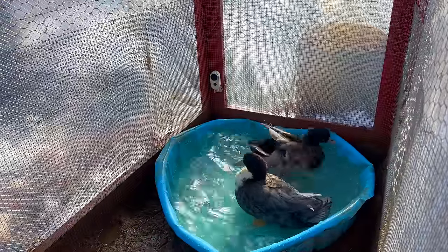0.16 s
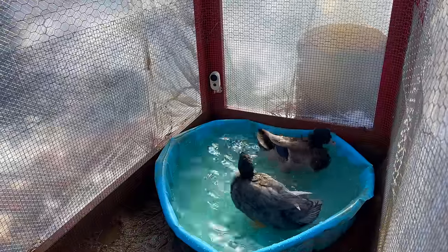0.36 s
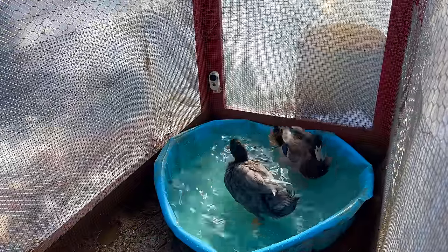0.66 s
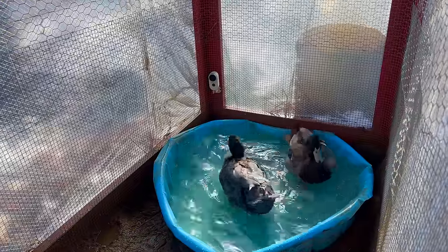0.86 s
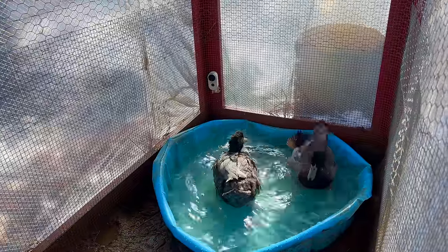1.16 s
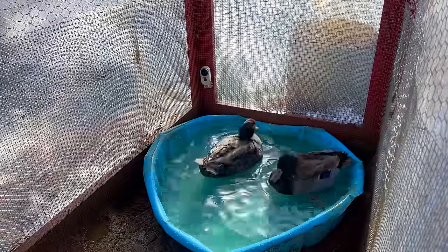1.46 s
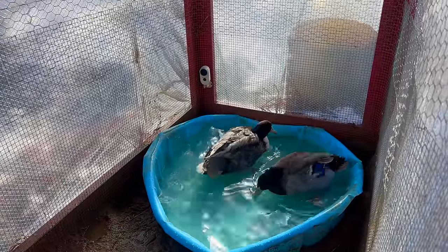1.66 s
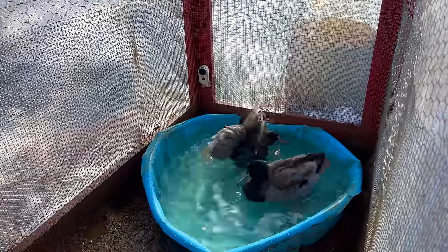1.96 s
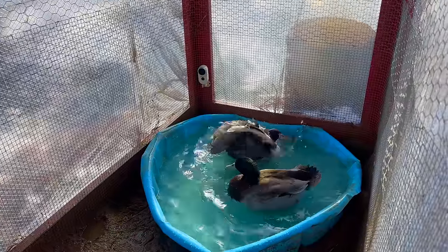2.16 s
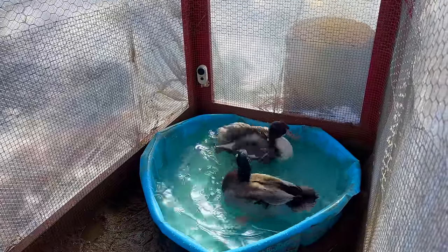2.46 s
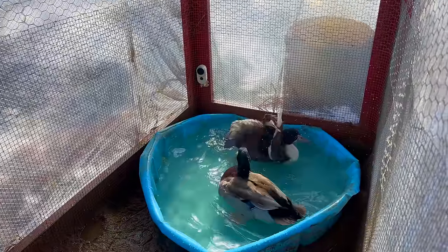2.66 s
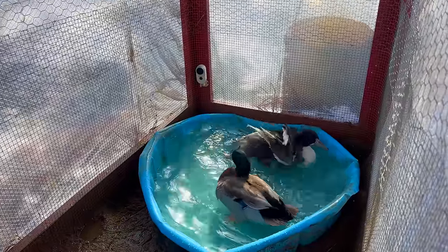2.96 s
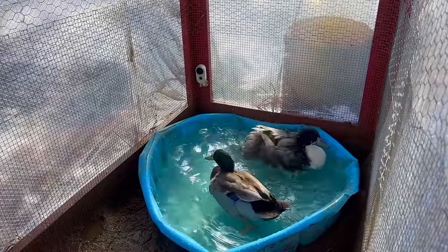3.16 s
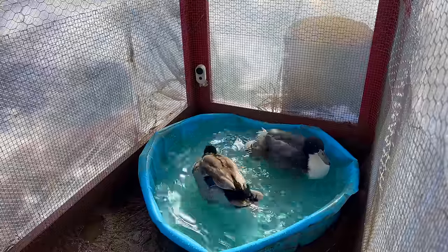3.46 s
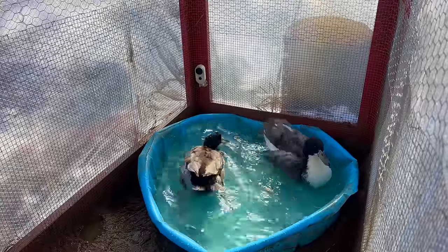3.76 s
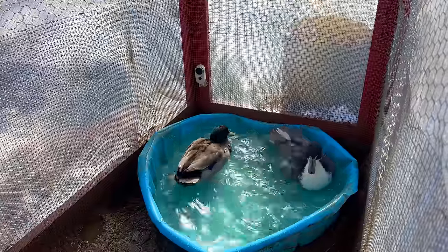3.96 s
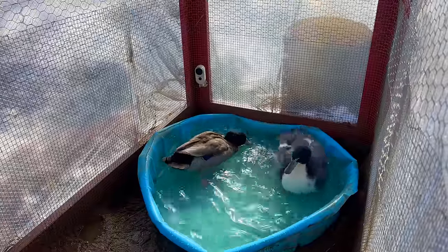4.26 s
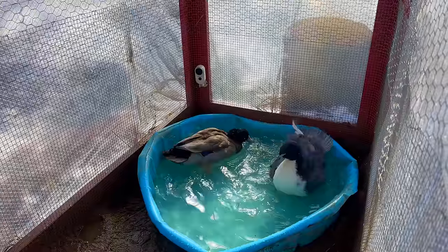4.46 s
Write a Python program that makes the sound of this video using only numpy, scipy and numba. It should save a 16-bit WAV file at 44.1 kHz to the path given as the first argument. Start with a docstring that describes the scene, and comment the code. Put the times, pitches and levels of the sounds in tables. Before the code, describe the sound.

Close duck bathing: bright splashes and plops, a quieter lull, a fast feather-shake buzz ending in a snap, then renewed splashing with short quacks.

```python
"""Ducks paddle and bathe in a small plastic pool in a pen, over a low rumble.
Hard paddling opens: bubble clouds ring, slaps, plops and drips on top; it eases under soft raspy quacks.
At 1.7 s a bird shivers its wet feathers: pulsed noise and stroke multiples buzz, rattle grows, a snap ends it.
Bathing resumes at 2.4 s with surges, plops and a few quacks; dull thumps and a last surge close.
Bubbles are decaying sines of rising pitch; near walls add short noise tails."""
import sys
import numpy as np
from scipy import signal
from scipy.fft import rfft, irfft, next_fast_len
from scipy.io import wavfile
from scipy.ndimage import uniform_filter1d
from numba import njit

SR = 44100
rng = np.random.default_rng(int(sys.argv[2]) if len(sys.argv) > 2 else 0)


def generate_wav(signal):
    """Clip the signal to [-1, 1] and save it as 16-bit WAV at the path in sys.argv[1]."""
    frames = np.transpose(np.atleast_2d(signal))
    scaled = np.clip(frames, -1, 1) * 32767
    pcm = np.round(scaled).astype(np.int16)
    wavfile.write(sys.argv[1], SR, pcm)


N = 202815
TIME = np.arange(N) / SR

# low rumble: time_s, level_db
RUMBLE_LEVEL = [(0, -53), (1.1, -52.5), (1.55, -56), (2.05, -49), (2.9, -50.5), (3.2, -53.5), (3.8, -54.5),
                (4.6, -50.5)]
# rumble filter: freq_hz, gain_db
RUMBLE_COLOUR = [(20, -40), (30, -24), (42, -10), (62, 0.5), (80, -2), (120, -6.5), (180, -10), (300, -25),
                 (1000, -45), (4000, -76)]

# thumps of large air pockets and the pool wall: start_s, peak_db, pitch_hz, t60_s
THUMPS = [(.213, -37.5, 307, 0.19), (0.235, -39, 185, 0.1), (1.086, -41.5, 73.7, 0.54),
          (2.777, -26, 160, 0.034), (3.16, -34.5, 312, 0.11), (4.453, -36, 340, 0.077),
          (4.455, -29, 158, 0.17), (4.56, -29, 143, 0.09)]

# quacks: loudest_s, level_db, rise_s, fall_s, pitch_hz, lowest_throat_hz, rasp (0-1)
QUACKS = [(.505, -43, 0.033, 0.041, 188.2, 1185, 0.66), (1.111, -50, 0.037, .032, 180, 1260, .75),
          (1.297, -47, 0.0091, 0.015, 200, 1270, 0.79), (1.524, -39, 0.012, 0.012, 567, 1276, 0.2),
          (2.669, -31.5, 0.018, .009, 430.4, 1272, 0.19), (2.897, -32, 0.023, 0.027, 214.4, 1263, 0.57),
          (4.198, -42, 0.021, 0.023, 167.9, 1295, 0.59)]
# throat resonances, scaled to lowest_throat_hz: freq_hz, width_hz, gain_db
THROAT = [(1270, 110, 0), (1500, 120, -1), (1710, 90, 0), (1990, 140, -13), (2200, 120, -8)]

# body hum of the shiver: stroke_multiple, level_db
HUM_PARTIALS = [(1, -4), (2, -8), (3, 3), (4, -8), (5, -5), (6, -10), (7, -13), (8, -14), (9, -9), (10, -1),
                (11, -6.5), (12, -6.5)]
# buzz of the stiff feathers: stroke_multiple, level_db
BUZZ_PARTIALS = [(22, -8), (32, -8), (35, -7), (37, -4), (38, -6), (39, -1), (40, -2), (41, 1), (44, -3),
                 (45, -7), (47, -5), (49, 0), (50, -1), (51, -8)]
# feather rattle filter: freq_hz, gain_db
RATTLE_COLOUR = [(1000, -25), (1350, -1.5), (1800, -32), (2150, -4), (2450, 1.5), (2850, 1), (3080, -1),
                 (3300, -3.5), (4500, -40)]
# wet feather swish filter: freq_hz, gain_db
SWISH_COLOUR = [(3500, -12), (4700, 0.5), (5900, 2.5), (7200, 2.5), (7700, 1), (9200, 4.5), (11000, -45),
                (14500, 0.5)]
# modes of the snap: freq_hz, level_db (re SNAP_DB), t60_s
SNAP_MODES = [(2760, -11, 0.015), (5600, -11, 0.004), (8760, 1, 0.0062), (13800, -3, .004),
              (15000, -3, .005)]

# single drops on the surface: start_s, peak_db, bubble_pitch_hz
DRIPS = [(.199, -33, 3100), (.229, -37, 2410), (.257, -30, 3740), (0.321, -33, 3270), (0.34, -39, 2900),
         (.388, -36.5, 2150), (.611, -34, 2410), (0.662, -39, 4500), (2.499, -31, 6350), (2.558, -40, 1530),
         (2.78, -32.5, 1730), (3.112, -35, 3130), (3.237, -27.5, 4620), (3.25, -32, 3560),
         (3.343, -36, 6950), (3.406, -36, 2670), (3.453, -28, 2270), (3.519, -35, 4570), (3.877, -43, 1253),
         (4.015, -34.5, 4030), (4.138, -39, 2820), (4.302, -40, 1784), (4.318, -38, 2580),
         (4.377, -37, 3770), (4.51, -33, 2780)]
# slaps of feet and breast on the water: start_s, level_db, middle_pitch_hz, decay_s
SLAPS = [(.001, -38, 1100, 0.014), (0.02, -43, 1610, 0.031), (.191, -37, 1370, .022),
         (0.251, -42, 1010, 0.014), (0.387, -43.5, 1220, 0.009), (0.608, -45.5, 2520, 0.014),
         (0.673, -63, 1380, 0.019), (1.002, -56, 1400, 0.015), (1.056, -53, 716, 0.022),
         (1.484, -49.5, 790, 0.0095), (1.496, -50.5, 1430, 0.023), (1.654, -57, 1870, 0.011),
         (2.311, -52, 1320, 0.013), (2.559, -46.5, 1390, 0.0056), (2.628, -45, 590, 0.021),
         (2.779, -42, 1370, 0.0058), (2.985, -46.5, 1520, 0.025), (3.072, -42.5, 2750, 0.0088),
         (3.147, -42, 1150, 0.013), (3.155, -44.5, 530, .018), (3.284, -45.5, 690, 0.014),
         (3.377, -49, 930, 0.024), (3.405, -45, 1660, 0.045), (3.441, -41, 860, 0.028),
         (3.45, -48, 2270, 0.014), (3.64, -42.5, 2110, 0.016), (3.652, -38.5, 1350, 0.02),
         (3.815, -54, 2070, 0.025), (3.877, -42.5, 1080, 0.0038), (4.016, -47.5, 3920, 0.013),
         (4.139, -54, 2640, 0.0088), (4.3, -47, 580, 0.015), (4.303, -48, 2080, 0.02),
         (4.449, -43, 745, 0.019), (4.581, -44, 687, 0.015)]
# single large bubbles: start_s, peak_db, pitch_hz, t60_s, rise_octaves_per_s
PLOPS = [(.058, -34.5, 1600, 0.14, 11.5), (.023, -28, 1270, .04, 5), (.193, -23, 1287, 0.036, 10),
         (.221, -40, 430, 0.039, 6), (.228, -27, 1050, 0.025, -2), (.254, -27, 1016, 0.024, -7),
         (.311, -39, 1270, 0.06, 7), (.336, -35.5, 1250, 0.029, 14), (.386, -34, 630, 0.05, -1),
         (.468, -39, 855, 0.046, 1), (.497, -29.5, 1950, 0.036, -4), (.584, -38, 1007, 0.051, -1.5),
         (.778, -42.5, 1275, 0.05, 2), (1.514, -38, 973, 0.057, -1), (2.556, -29.5, 1286, 0.08, 17.5),
         (2.688, -28.5, 1840, 0.04, 9.5), (2.859, -29, 1200, 0.082, 9), (2.914, -34, 2205, 0.042, -4),
         (3.073, -29.5, 1990, 0.032, -4), (3.128, -28, 1750, 0.027, 7), (3.228, -25.5, 1248, 0.071, 1),
         (3.32, -37.5, 1064, 0.081, 2), (3.446, -25.5, 1244, 0.029, 0), (3.524, -39.5, 934, 0.08, 12),
         (3.636, -28, 730, 0.037, -4), (3.641, -24, 2330, 0.026, 25.5), (3.689, -28.5, 714, 0.06, 2.5),
         (3.792, -39, 1970, 0.029, 16), (3.827, -36.5, 1613, 0.05, 6), (4, -42, 1022, 0.14, 9.5),
         (4.016, -36, 3540, 0.055, 8), (4.154, -30, 1650, 0.038, 6), (4.186, -36.5, 978, 0.064, -1.5),
         (4.216, -35, 1380, 0.043, 4), (4.303, -42, 1776, 0.049, 7), (4.551, -37, 750, 0.036, -1)]

# how hard the birds stir the water: time_s, effort_db (re the water levels below)
PADDLING = [(0, 4.5), (.27, -10), (.42, -8.5), (.56, -19.5), (.82, -25.5), (.98, -19), (1.22, -21),
            (1.42, -28.5), (1.66, -28.5), (2.2, -7), (2.46, -8.5), (2.8, -4), (3.04, -9.5), (3.42, -8.5),
            (3.6, -15.5), (3.82, -20.5), (4.1, -14.5), (4.34, -14), (4.6, -1.5)]
# surges as a bird kicks or dips: peak_s, half_width_s (to 1/e power), spray_db, slosh_db
SURGES = [(0.223, 0.047, -34.5, -43), (0.638, 0.049, -52, -57), (0.947, 0.028, -53, -61.5),
          (1.06, 0.027, -65, -58), (1.513, 0.012, -55.5, -69), (1.64, 0.024, -57.5, -83),
          (2.669, 0.019, -41.5, -56), (2.78, 0.046, -48, -56), (2.905, 0.023, -42.5, -52),
          (2.98, 0.015, -39.5, -52), (3.148, 0.013, -39, -46.5), (3.885, 0.015, -51, -53.5),
          (4.46, 0.15, -48, -53)]
# thrown spray falling back: start_s, level_db, decay_s
SPATTER = [(0.107, -32, .0053), (0.197, -31.5, 0.0054), (0.323, -37, 0.029), (0.464, -37.5, 0.022),
           (1.482, -51, 0.014), (2.048, -31, 0.012), (2.351, -30.5, 0.016), (2.5, -38, 0.026),
           (3.07, -40, 0.045), (3.111, -38, 0.027), (3.233, -37.5, 0.031), (3.276, -39, 0.025),
           (3.481, -38.5, 0.034), (3.654, -40, 0.019), (4.139, -43, 0.045), (4.22, -40, 0.015),
           (4.372, -43, 0.021), (4.478, -39.5, 0.038), (4.515, -37, 0.012)]
# spray filter: freq_hz, gain_db
SPRAY_COLOUR = [(300, -20), (900, -4), (1300, -1), (2300, .5), (3200, -1.5), (4300, -.5), (5300, -1.8),
                (7100, 1), (7700, 0), (8700, 5.5), (9500, 2.5), (10500, -5), (12300, -4), (13200, 2.5),
                (14700, 4), (15500, 3)]
# gain of the spray above TREBLE_EDGE_HZ: time_s, gain_db
SPRAY_TREBLE = [(0, -8), (.7, -7), (1.4, -15.5), (2.3, -10), (3.3, -8), (3.8, -6), (4.6, -2.5)]
# slosh filter: freq_hz, gain_db
SLOSH_COLOUR = [(30, -40), (90, -3), (170, -1), (320, -0.5), (430, -4), (620, 3), (1000, -7), (1500, -8.5),
                (2200, -9.5), (4000, -28)]

# stereo width: freq_hz, side_re_mid_db
WIDTH = [(120, -11), (300, -4), (1200, -2), (4500, -1), (6500, -5), (8500, -11), (15000, -16)]
# microphone colour, left minus right: freq_hz, difference_db
MIC_DIFFERENCE = [(200, 0), (500, 1), (1200, -0.5), (2500, -1), (4300, 1.5), (6500, 7.5), (9000, 1)]

# shiver
SHIVER_START_S, SHIVER_END_S, SHIVER_ATTACK_S, SHIVER_RELEASE_S = 1.682, 2.416, 0.017, 0.076
SHIVER_SWELL_DB_PER_S = 2
SHED_ATTACK_S = 0.085  # swish and sizzle build more slowly
STROKE_HZ = 61.83
HUM_DB, RUSTLE_DB, SWISH_DB = -44, -49, -43.5
RATTLE_DB, RATTLE_SWELL_DB, RATTLE_START_S, RATTLE_RISE_S = -47, 7.5, 2.13, 0.022
BUZZ_DB = -3.5  # within the rattle
SIZZLE_DB, SIZZLE_HZ, SIZZLE_WIDTH_HZ = -47, 8200, 380
SHIVER_SPRAY_DB, SHIVER_SLOSH_DB = -45, -49.5  # water shaken off and stirred up
SNAP_S, SNAP_DB = 2.3491, -22

# water
SPRAY_DB, SLOSH_DB, DROPS_DB = -38, -49.5, -52.5  # at 0 dB effort
SLOSH_FOLLOW, DROPS_FOLLOW = 0.64, 0.93  # dB per dB of effort
SPURT_DB = 2.5  # spray flicker
TREBLE_EDGE_HZ = 9100

# microphones
MIC_LAG_S, LAG_FADE_HZ, TOP_HZ = 2.5e-5, 8000, 15800


def undb(db):
    """Decibels to gain."""
    return 10 ** (np.asarray(db) / 20)


def unit(x):
    """Scale to rms 1."""
    return x / np.sqrt(np.mean(x ** 2) + 1e-20)


def curves(table):
    """Interpolate each table column through time."""
    time_s, *columns = np.transpose(table)
    return [np.interp(TIME, time_s, column) for column in columns]


def colour(x, points):
    """Filter by (Hz, dB) points, linear in log frequency."""
    hz, db = np.transpose(points)
    size = next_fast_len(x.shape[-1] + 2048)
    f = np.maximum(np.fft.rfftfreq(size, 1 / SR), 1)
    gain = undb(np.interp(np.log(f), np.log(hz), db))
    return irfft(rfft(x, size) * gain, size)[..., :x.shape[-1]]


def resonate(x, hz, width_hz):
    """One resonance, gain 1 at its centre."""
    return signal.lfilter(*signal.iirpeak(hz, hz / width_hz, fs=SR), x)


def add(track, start_s, sound):
    """Mix a sound in at start_s."""
    start = int(np.clip(start_s * SR, 0, N - 1))
    track[start:start + len(sound)] += sound[:N - start]


def spread(mid, side):
    """Left and right from mid and side."""
    return mid + side * np.array([[1], [-1]])


@njit
def ring(length, starts, hz, cycles, sizes, glide):
    """Bubbles: each rings for some cycles down to -60 dB while its pitch rises by the share glide."""
    out = np.zeros(length)
    for k in range(len(starts)):
        life = cycles[k] * SR / hz[k]  # samples
        first = int(starts[k] * SR)
        step = 2 * np.pi * hz[k] / SR
        z = sizes[k] + 0j
        turn = np.exp(1j * step - np.log(1000) / life)
        bend = np.exp(1j * step * glide / life)
        for i in range(first, min(length, first + int(life))):
            z, turn = z * turn, turn * bend
            out[i] += z.imag
    return out


def cloud(lo_hz, hi_hz, cycles, scatter_db, count, glide=0.088):
    """An unbroken patter of bubbles between two pitches, a few much larger than the rest."""
    when, pitch, life, size = rng.random((count, 4)).T
    hz = lo_hz + (min(hi_hz, SR / 2.5) - lo_hz) * pitch
    sizes = undb(-scatter_db * np.log(np.maximum(size, .01))) * np.sqrt(hz)
    sizes = sizes * rng.choice([-1, 1], count)
    return unit(ring(N, when * N / SR, hz, cycles * (.5 + life), sizes, glide))


def bubble(hz, t60_s, rise_oct_per_s, attack_s):
    """A large bubble swells and rings; its pitch glides, by at most an octave upward."""
    t = TIME[:SR // 3]
    phase = 2 * np.pi * np.cumsum(hz * 2 ** np.minimum(rise_oct_per_s * t, 1)) / SR
    return np.sin(phase) * (1 - np.exp(-t / attack_s)) * np.exp(-np.log(1000) * t / t60_s)


def pen(x, wet_db, t60_s, gap_s):
    """The near walls return a short, dense tail that differs left and right."""
    t = TIME[:SR // 3]
    tail = rng.standard_normal((2, len(t))) * np.exp(-np.log(1000) * t / t60_s) * (t > gap_s)
    tail = tail / np.sqrt(np.sum(tail ** 2, axis=1, keepdims=True))
    tail = colour(tail, [(100, -5.0), (400, -1.5), (1500, 5.5), (4500, 6.0), (9000, 11.5)])
    return x + undb(wet_db) * signal.fftconvolve(np.atleast_2d(x), tail, axes=1)[:, :N]


def rumble():
    """Low filtered noise, slowly varying in level, nearly the same on both sides."""
    level_db, = curves(RUMBLE_LEVEL)
    mid, side = (unit(colour(rng.standard_normal(N), RUMBLE_COLOUR)) for _ in range(2))
    even = mid / np.sqrt(uniform_filter1d(mid ** 2, size=SR // 6))
    return spread(even, undb(-17.5) * side) * undb(level_db)


def thumps():
    """Large air pockets and the pool wall give deep decaying thumps."""
    out = np.zeros(N)
    for start_s, db, hz, t60_s in THUMPS:
        add(out, start_s, undb(db) * bubble(hz, t60_s, rise_oct_per_s=-0.18, attack_s=0.002))
    return out


def quacks(jitter=0.1163, open_share=1.0, climb_per_s=1.97):
    """Pulses and gated air ring the throat; pitch climbs as the bill opens, rasp makes pulses uneven."""
    out = np.zeros(N)
    t = np.arange(-SR // 8, SR // 8) / SR
    band = signal.butter(4, [1050, 2550], "band", fs=SR, output="sos")
    for loudest_s, db, rise_s, fall_s, hz, throat_hz, rasp in QUACKS:
        rasp = np.clip(rasp, 0, 1)
        wobble = unit(uniform_filter1d(rng.standard_normal(len(t)), size=200))
        phase = np.cumsum(hz * (1 + jitter * rasp * wobble)) / SR  # cycles
        pulses = sum(np.cos(2 * np.pi * k * phase) for k in np.arange(1, SR / 10 / hz))
        air = np.exp(-(phase % 1) / open_share) * rng.standard_normal(len(t))
        source = np.sqrt(1 - rasp) * unit(pulses) + np.sqrt(rasp) * unit(air)
        scale = throat_hz / THROAT[0][0]
        voice = sum(undb(gain_db) * resonate(source, f * scale, w) for f, w, gain_db in THROAT)
        voice = signal.sosfilt(band, voice)
        # time warp: pitch and resonances climb up to the loudest point
        voice = np.interp(t + climb_per_s * np.minimum(t, 0) ** 2 / 2, t, voice)
        # even air pressure through the call
        voice = voice / np.sqrt(uniform_filter1d(voice ** 2, size=SR // 70) + 1e-12)
        swell = np.exp(-np.abs(t / np.where(t < 0, rise_s, fall_s)) ** 1.18)
        call = voice * swell
        add(out, loudest_s + t[0], undb(db) * call * np.sqrt(np.sum(swell ** 2) / np.sum(call ** 2)))
    return out


def strokes(jitter_s=2e-5):
    """Count of the shiver's fast, nearly even strokes through time."""
    knots = np.arange(0, N / SR, 1 / 62)
    return STROKE_HZ * (TIME + jitter_s * np.interp(TIME, knots, rng.standard_normal(len(knots))))


def shaking(attack_s=SHIVER_ATTACK_S):
    """Strength of the shiver, 0-1: a start, a hold that slowly swells, a release."""
    onset = (TIME - SHIVER_START_S) / attack_s
    release = (SHIVER_END_S - TIME) / SHIVER_RELEASE_S
    gate = np.clip(np.minimum(onset, release), 0, 1)
    return gate * undb(SHIVER_SWELL_DB_PER_S * np.minimum(TIME - SHIVER_END_S, 0))


def partials(turns, levels, waver_db, drift_rad, count=90):
    """Stroke multiples while the shiver lasts; each wavers in level and timing on its own."""
    out, on = np.zeros(N), shaking() > 0
    knots = np.linspace(0, N / SR, count)
    for k, db in levels:
        level, lag = (np.interp(TIME[on], knots, rng.standard_normal(count)) for _ in range(2))
        phase = 2 * np.pi * (k * turns[on] + rng.random()) + drift_rad * lag
        out[on] += undb(db + waver_db * level) * np.sin(phase)
    out[on] = unit(out[on])
    return out


def hum(turns, attack_s=0.07):
    """The shivering body hums at the stroke rate and its multiples."""
    tone = partials(turns, HUM_PARTIALS, waver_db=.8, drift_rad=.08, count=40)
    return shaking(attack_s) * undb(HUM_DB) * tone


def shiver(turns, loose=0.65):
    """Wet feathers rustle and swish in pulsed noise; stiff ones buzz and rattle, later louder and sizzling."""
    swell = .5 + .5 * np.tanh((TIME - RATTLE_START_S) / RATTLE_RISE_S)
    # two flicks per stroke, one stronger
    beat = unit(np.exp(0.28 * np.cos(4 * np.pi * turns) + 0.11 * np.cos(2 * np.pi * turns)))
    buzz = partials(turns, BUZZ_PARTIALS, waver_db=1.0, drift_rad=0.25, count=45)
    rattle = unit(colour(beat * rng.standard_normal(N), RATTLE_COLOUR)) * loose + buzz * undb(BUZZ_DB)
    rustle = unit(resonate(resonate(beat * rng.standard_normal(N), 1300, 880), 1530, 1100))
    swish = unit(colour(beat * rng.standard_normal(N), SWISH_COLOUR))
    sizzle = resonate(beat * rng.standard_normal(N), SIZZLE_HZ, SIZZLE_WIDTH_HZ)
    sizzle = unit(resonate(sizzle, SIZZLE_HZ, 2 * SIZZLE_WIDTH_HZ))
    dull = rustle * undb(RUSTLE_DB) + rattle * undb(RATTLE_DB + RATTLE_SWELL_DB * swell)
    bright = swish * undb(SWISH_DB) + sizzle * swell * undb(SIZZLE_DB)
    return shaking() * dull + shaking(SHED_ATTACK_S) * bright


def snap():
    """A hard, bright snap of decaying modes, perhaps a flung drop striking the plastic wall."""
    out, t = np.zeros(N), TIME[:SR // 10]
    for hz, db, t60_s in SNAP_MODES:
        mode = np.sin(2 * np.pi * hz * t) * np.exp(-np.log(1000) * t / t60_s)
        add(out, SNAP_S, undb(SNAP_DB + db) * mode)
    return out


def drips(tick_db=-2, tick_s=0.000077, cycles=65, rise_oct_per_s=3.3):
    """A drop strikes with a sharp tick while its small bubble chirps upward."""
    out = np.zeros(N)
    t = TIME[:SR // 3]
    for start_s, db, hz in DRIPS:
        tick = unit(resonate(rng.standard_normal(len(t)), 5500, 3400)) * np.exp(-t / tick_s)
        chirp = bubble(hz, cycles / hz, rise_oct_per_s, attack_s=0.0012)
        add(out, start_s, undb(db) * (undb(tick_db) * tick + chirp))
    return out


def plops(foam_db=-14, count=12):
    """Lone large bubbles, each with a few small ones in its wake."""
    out = np.zeros(N)
    for start_s, db, hz, t60_s, rise in PLOPS:
        add(out, start_s, undb(db) * bubble(hz, t60_s, rise, attack_s=0.0022))
        late, pitch = rng.random((count, 2)).T
        wake_hz = hz * 2 ** (1.2 * pitch - .25)
        wake = ring(SR // 4, 0.61 * t60_s * late, wake_hz, np.full(count, 22.), 1 - late, 0.055)
        add(out, start_s, undb(db + foam_db) * wake)
    return out


def slaps(octaves=0.4, cycles=19, scatter_db=3, count=70):
    """Each slap traps a burst of bubbles; the later ones are weaker."""
    out = np.zeros(N)
    for start_s, db, hz, decay_s in SLAPS:
        age = 3 * decay_s * (np.arange(count) + rng.random(count)) / count
        pitch, size = rng.standard_normal((count, 2)).T
        sizes = undb(scatter_db * size) * np.exp(-age / decay_s) * rng.choice([-1, 1], count)
        burst_hz = np.minimum(hz * 2 ** (octaves * pitch), SR / 3)
        burst = ring(SR // 4, age, burst_hz, np.full(count, 1. * cycles), sizes, 0.25)
        add(out, start_s, undb(db) * burst / np.sqrt(np.sum(burst ** 2) / (decay_s * SR)))
    return out


def froth(wake_db=-14, wake_s=0.085):
    """After each slap trapped air keeps rising, as a fading patter of chirping bubbles."""
    power = np.zeros(N)
    for start_s, db, _, _ in SLAPS:
        age = np.maximum(TIME - start_s, 0)
        power = power + (undb(db + wake_db) * np.exp(-age / wake_s) * (1 - np.exp(-age / 0.018))) ** 2
    mid, side = (cloud(800, 3400, cycles=30, scatter_db=2.5, count=2200, glide=.3) for _ in range(2))
    return spread(mid, undb(-10) * side) * np.sqrt(power)


def water():
    """Paddling drives bubble clouds of slosh, spray and drops; surges, shiver and spatter add power."""
    (effort_db,), (treble_db,) = curves(PADDLING), curves(SPRAY_TREBLE)
    spray_power = undb(SPRAY_DB + effort_db) ** 2 + (undb(SHIVER_SPRAY_DB) * shaking()) ** 2
    slosh_power = undb(SLOSH_DB + SLOSH_FOLLOW * effort_db) ** 2 + (undb(SHIVER_SLOSH_DB) * shaking()) ** 2
    for peak_s, width_s, spray_db, slosh_db in SURGES:
        swell = np.exp(-((TIME - peak_s) / width_s) ** 2)
        spray_power = spray_power + undb(spray_db) ** 2 * swell
        slosh_power = slosh_power + undb(slosh_db) ** 2 * swell
    # water leaves the feathers in spurts, so the spray flickers
    knots = np.arange(0, N / SR, .016)
    flicker = np.interp(TIME, knots, rng.standard_normal(len(knots)))
    spray_power = spray_power * undb(SPURT_DB * flicker) ** 2
    for start_s, db, decay_s in SPATTER:
        fall = undb(db) * np.exp(-np.abs(TIME - start_s) / decay_s)
        spray_power = spray_power + (TIME >= start_s) * fall ** 2
    drops_gain = undb(DROPS_DB + DROPS_FOLLOW * effort_db)
    high = signal.butter(2, TREBLE_EDGE_HZ, "high", fs=SR, output="sos")
    clouds = []
    for _ in range(2):
        spray = unit(colour(cloud(506, 16640, cycles=11, scatter_db=2.8, count=28000), SPRAY_COLOUR))
        spray = spray + (undb(treble_db) - 1) * signal.sosfiltfilt(high, spray)
        drops = cloud(700, 5500, cycles=40, scatter_db=4, count=380, glide=.18)
        slosh = unit(colour(cloud(113.3, 2546, cycles=22.8, scatter_db=2.5, count=6000), SLOSH_COLOUR))
        clouds.append(spray * np.sqrt(spray_power) + drops * drops_gain + slosh * np.sqrt(slosh_power))
    return spread(clouds[0], colour(clouds[1], WIDTH))


def scene():
    """Birds and water in the pen over the rumble; shiver, snap and thumps drier, hum and rumble dry."""
    turns = strokes()
    close = spread(shiver(turns), colour(shiver(turns), WIDTH)) + thumps() + snap()
    mix = pen(water() + froth(), wet_db=-9.5, t60_s=0.095, gap_s=0.002)
    mix = mix + pen(slaps() + drips() + plops(), wet_db=-5, t60_s=0.11, gap_s=0.0013)
    mix = mix + pen(quacks(), wet_db=-2, t60_s=0.039, gap_s=0.00226)
    mix = mix + pen(close, wet_db=-12, t60_s=0.073, gap_s=0.0012)
    return mix + hum(turns) + rumble()


def record(dry):
    """Two microphones differ in colour; the right one lags, less toward the treble; the top is cut."""
    left, right = (colour(x, [(hz, sign * db / 2) for hz, db in MIC_DIFFERENCE])
                   for x, sign in zip(dry, (1, -1)))
    size = next_fast_len(N)
    f = np.fft.rfftfreq(size, 1 / SR)
    lag_s = MIC_LAG_S / (1 + (f / LAG_FADE_HZ) ** 2)
    right = irfft(rfft(right, size) * np.exp(-2j * np.pi * f * lag_s), size)[:N]
    return signal.sosfilt(signal.ellip(10, .2, 70, TOP_HZ, fs=SR, output="sos"), [left, right])


dry = scene()
out = record(dry)
generate_wav(out)
```